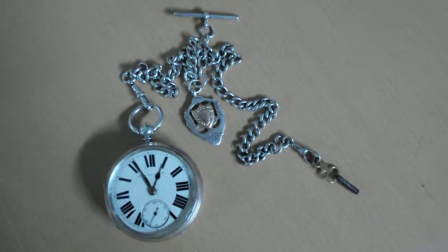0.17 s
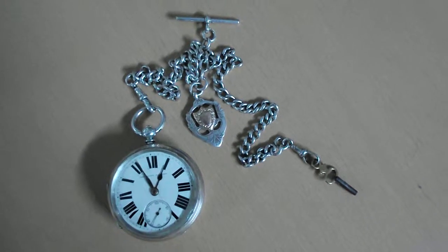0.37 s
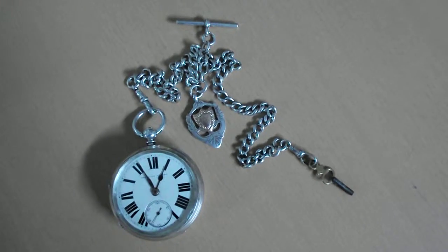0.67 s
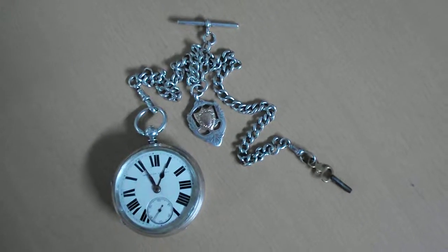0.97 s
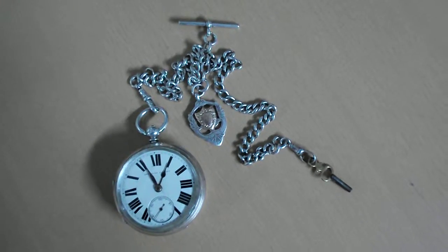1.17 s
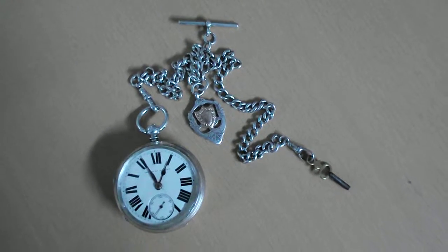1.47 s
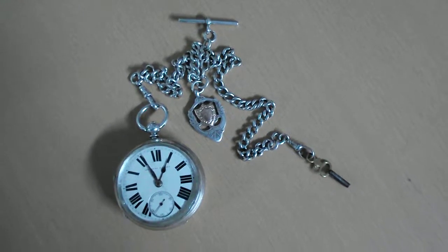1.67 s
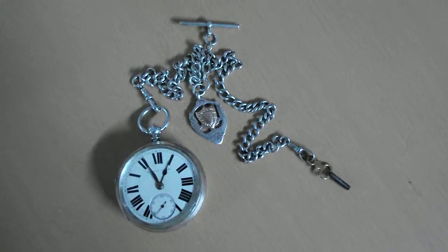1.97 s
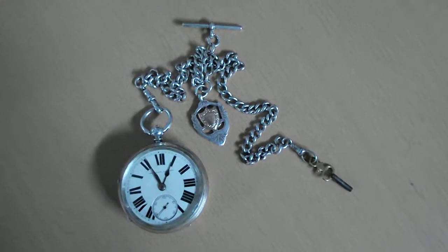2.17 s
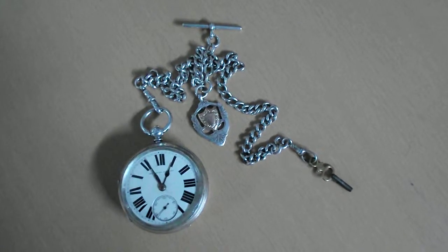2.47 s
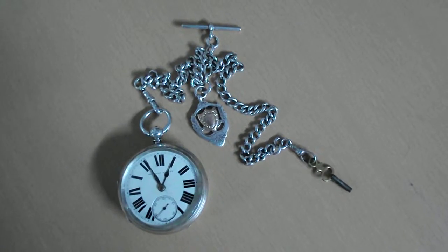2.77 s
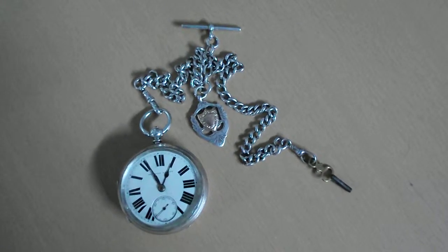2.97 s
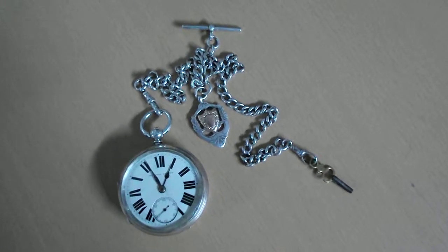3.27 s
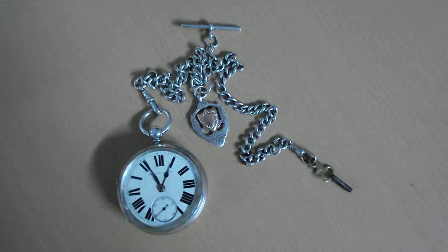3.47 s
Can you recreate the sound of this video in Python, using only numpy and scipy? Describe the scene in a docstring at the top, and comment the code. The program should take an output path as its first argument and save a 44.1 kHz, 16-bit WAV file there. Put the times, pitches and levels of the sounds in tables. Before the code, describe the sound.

Close, dry ticking of a mechanical pocket watch on a table, tick and tock slightly different, from start to end. Behind it are a deep room rumble, microphone hiss, faint rustling and two tiny high whistles.

```python
"""A pocket watch ticks on a table in a quiet room, over a low rumble and a soft hiss that last throughout.
Each beat is a few small blows of the escapement, which excite the decaying modes of the case.
The rumble is noise selected by the room's modes; the microphone hiss and a faint rustle are filtered noise.
A thin electronic whine is a tone multiplied by a square wave; two short whistles are gated, rough tones."""
import sys
import numpy as np
from scipy import signal
from scipy.fft import rfft, irfft
from scipy.io import wavfile
from scipy.ndimage import uniform_filter1d

SR = 44100
rng = np.random.default_rng(int(sys.argv[2]) if len(sys.argv) > 2 else 0)


def volts_from_db(level):
    """Convert decibel levels to linear amplitude ratios."""
    exponent = np.asarray(level, float) / 20
    return 10 ** exponent


def file_out(sig):
    """Save sig as 16-bit WAV at sys.argv[1]."""
    # one column per channel
    cols = np.atleast_2d(sig).T
    # limit, then scale
    lim = np.clip(cols, -1, 1)
    pcm = np.round(lim * 32767).astype(np.int16)
    wavfile.write(sys.argv[1], SR, pcm)


N = 159642  # length [samples]


def level(x, db):
    """Root-mean-square normalisation: scale a signal to an rms level in dB."""
    return x * volts_from_db(db) / np.sqrt(np.mean(x ** 2))


def shaped(gain):
    """Spectral shaping: white noise multiplied by a gain at each frequency."""
    spectrum = rfft(rng.standard_normal(N))
    return irfft(spectrum * gain(np.fft.rfftfreq(N, 1 / SR)), N)


def resonance(f, hz, width_hz):
    """Resonance applied twice: the squared response, at half amplitude across about width_hz."""
    return 1 / (1 + ((f ** 2 - hz ** 2) / (width_hz * f + 1e-9)) ** 2)


def walk(rate):
    """Smoothed random process: rate fresh values per second, averaged twice, spread near 1."""
    hold = int(SR / rate)
    steps = np.repeat(rng.standard_normal(N // hold + 1), hold)
    return 1.08 * uniform_filter1d(uniform_filter1d(steps, hold), hold)[:N]


def curve(rows):
    """Linear interpolation: the columns of a table joined by straight lines in time."""
    rows = np.array(rows)
    return [np.interp(np.arange(N) / SR, rows[:, 0], col) for col in rows.T[1:]]


# room modes driven by distant rumble: (frequency [Hz], width [Hz], gain relative within its range [dB])
ROOM_MODES = [(27, 21.8, -35.5), (40.4, 11.1, -37.5), (62, 15, -47), (101.6, 14, -36), (117.5, 16.4, -40),
              (145.7, 11.2, -44.5), (158.6, 20.3, -42.5), (180, 26, -40), (211.4, 20.6, -46.5),
              (225.1, 20.3, -43), (257.5, 14.4, -47), (269.8, 34, -51.5), (285, 10.6, -48),
              (303.3, 13, -45.5), (407, 20, -60.5), (457, 17, -63), (598, 19.4, -63), (722, 40, -65.5),
              (990, 33, -69)]
# wavering rumble: (time [s], level below 80 Hz [dB], level 80-135 Hz [dB], level 135-270 Hz [dB],
# level above 270 Hz [dB])
RUMBLE_SWELL = [(0, -31, -35, -36, -43.5), (.4, -32, -35, -36.5, -45), (.8, -31.5, -36, -36, -44.5),
                (1.02, -31, -38.5, -38, -45), (1.25, -32, -34, -35, -45), (1.6, -33.5, -36, -38, -47),
                (1.9, -28.5, -38, -38, -45), (2.3, -31.5, -40, -38.5, -43), (2.75, -32.5, -36, -35, -48),
                (3.15, -30.5, -37, -36, -45), (3.35, -29, -38.5, -38, -44.5), (3.62, -31.5, -33, -33, -44)]


def rumble():
    """Modal excitation: each room mode selects its own noise and wavers alone, in ranges of set level."""
    edges_hz, wander_db, wander_rate_hz = (80, 135, 270), 0.8, 4.97
    ranges = np.zeros((len(edges_hz) + 1, N))
    for hz, width_hz, db in ROOM_MODES:
        gain = volts_from_db(db + wander_db * walk(wander_rate_hz))
        mode = shaped(lambda f: resonance(f, hz, width_hz))
        ranges[np.searchsorted(edges_hz, hz)] += gain * mode
    return sum(volts_from_db(db) * level(x, 0) for x, db in zip(ranges, curve(RUMBLE_SWELL)))


# broad floor of room air and microphone: (frequency [Hz], relative spectral level [dB])
HISS_SPECTRUM = [(190, -47), (320, -4.5), (500, -11.5), (990, -15.5), (1400, -18.5), (2500, -20.5),
                 (3600, -22.5), (5500, -25), (8000, -27.5), (11300, -29.5), (16000, -32.5)]


def hiss():
    """Broadband noise: a smooth spectrum, interpolated over log frequency, with a slow level wander."""
    rms_before_wander_db, wander_db, wander_rate_hz = -46, 0.51, 2.74
    hz, db = np.array(HISS_SPECTRUM).T
    wander = volts_from_db(wander_db * walk(wander_rate_hz))
    noise = shaped(lambda f: volts_from_db(np.interp(np.log(f + 1), np.log(hz), db)))
    return wander * level(noise, rms_before_wander_db)


# faint rustle that swells in the hiss: (time [s], rms level before flicker [dB])
RUSTLE_SWELL = [(0, -66), (.3, -60), (.55, -66), (1.0, -66), (1.2, -64), (1.45, -60), (1.7, -66),
                (2.1, -65), (2.38, -66), (2.44, -58), (2.6, -60), (2.75, -63), (3.1, -62), (3.62, -63)]


def rustle():
    """Amplitude-modulated band noise: soft mid-treble noise that swells and quickly flickers."""
    centre_hz, width_hz = 3200, 2300
    flicker_db, flicker_rate_hz = 2.5, 25.04
    envelope = volts_from_db(curve(RUSTLE_SWELL)[0] + flicker_db * walk(flicker_rate_hz))
    return envelope * level(shaped(lambda f: resonance(f, centre_hz, width_hz)), 0)


def whine():
    """Polarity modulation: a lopsided square wave splits a tone into sidebands; a resonance trims the far ones."""
    tone_hz, flip_hz, lopsided, rms_db = 10649.15, 40.335, .115, -60.6
    band_hz, band_width_hz = 10780, 1100
    t = np.arange(N) / SR
    flips = signal.square(2 * np.pi * (flip_hz * t + rng.random())) + lopsided
    spectrum = rfft(flips * np.sin(2 * np.pi * tone_hz * t))
    band = resonance(np.fft.rfftfreq(N, 1 / SR), band_hz, band_width_hz)
    return level(irfft(spectrum * band, N), rms_db)


# short whistles: (start [s], length [s], frequency [Hz], rms level while fully on [dB])
WHISTLES = [(.205, .082, 6515, -59.5), (2.218, .068, 6490, -58.5)]


def whistles():
    """Gated tone with narrowband noise: the noise around each sine makes it slightly rough."""
    rough_width_hz, rough_db, fade_s = 220, -4, .004  # roughness level is relative to the sine
    t, out = np.arange(N) / SR, 0
    for start, length, hz, db in WHISTLES:
        gate = np.clip(np.minimum(t - start, start + length - t) / fade_s, 0, 1)
        rough = level(shaped(lambda f: resonance(f, hz, rough_width_hz)), rough_db)
        sine = np.sqrt(2) * np.sin(2 * np.pi * hz * t)
        out = out + gate * level(sine + rough, db)
    return out


# modes of the case: (frequency [Hz], relative level [dB], t60 [s])
CASE_MODES = [(3625, -9, 0.04), (3674, -8, 0.042), (4320, -10.5, 0.05), (5120, -10.5, 0.038),
              (5460, -7, 0.016), (5760, 1, 0.019), (5920, -4.5, 0.017), (6370, -14, 0.017),
              (6456, -5, 0.022), (6580, -12, .02), (9200, -11.5, 0.011), (10270, -13.5, .015)]
# drop blow of each beat, tick and tock in turn: (time [s], reference level [dB], low modes [dB],
# top modes [dB], rebounds [dB])
BEATS = [(.189, -36.5, -5, -2, 5), (0.4238, -35.5, 3, 1, 0), (0.6545, -32.5, -2, -2, 1),
         (0.889, -32.5, 2.5, -7, -9), (1.1184, -36.5, 0, 1, 3.5), (1.3548, -34.5, -2, -2, 0.5),
         (1.5828, -35.5, -2, 0, 2.5), (1.8202, -33, -2, 0, 0.5), (2.0477, -38.5, 0, 2, 3),
         (2.2852, -33.5, -4, -4, -3), (2.5132, -40.5, 0, 5, 2), (2.7496, -40.5, -1, 1, 4),
         (2.9786, -40, 1.5, 2, 5), (3.2151, -35.5, 1, 1, -3), (3.4436, -37.5, -2.5, -1, 3.5)]
# unlock, impulse, touch, drop, two rebounds: (offset from drop [s], relative level [dB], top modes [dB],
# low modes in a tick [dB], low modes in a tock [dB])
BLOWS = [(-.0435, -19, -2, 1, 1), (-.0222, -22, 11, 0, 0), (-.003, -19, 0, 0, 0), (0, 0, 0, -10, -7),
         (.0022, -7, -2, -2, 4), (.006, -18, -5, 14, 5)]


def watch():
    """Impact excitation: every blow rings the case as a sum of exponentially decaying modes."""
    early_blows_db = -32.5  # reference level of the blows before the drop, alike in every beat
    blow_scatter_db, blow_jitter_s = 1.5, .0003  # for every blow but the drop
    mode_scatter_db, mode_jitter = 1.3, .006  # jitter as a fraction of the mode frequency
    contact_s = 0.00098  # the ring rises linearly over this time
    out, t = np.zeros(N + SR), np.arange(SR // 12) / SR
    modes = np.array(CASE_MODES)
    mode_hz, mode_db, t60 = modes[:, 0], modes[:, 1], modes[:, 2:]
    low = mode_hz < 4800
    top = (mode_hz > 6300) & (mode_hz < 7000)
    decay = np.exp(-np.log(1000) * t / t60)
    contact = np.minimum(t / contact_s, 1)
    chance = rng.standard_normal((len(BEATS), len(BLOWS), 2 + 2 * len(modes)))
    for k, (time, drop_db, low_db, top_db, rebound_db) in enumerate(BEATS):
        for (offset, blow_db, blow_top_db, *blow_low_db), c in zip(BLOWS, chance[k]):
            not_drop = offset != 0
            if offset < 0:
                beat_db = early_blows_db
            else:
                beat_db = drop_db + low * low_db + top * top_db + (offset > 0) * rebound_db
            strength_db = blow_db + not_drop * blow_scatter_db * c[0]
            colour_db = low * blow_low_db[k % 2] + top * blow_top_db  # even beats tick, odd beats tock
            gain = volts_from_db(beat_db + strength_db + mode_db + colour_db + mode_scatter_db * c[2::2])
            hz = mode_hz * (1 + mode_jitter * c[3::2])
            ring = gain @ (np.sin(2 * np.pi * hz[:, None] * t) * decay)
            i = int((time + offset + not_drop * blow_jitter_s * c[1]) * SR)
            out[i:i + len(t)] += ring * contact
    return out[:N]


def scene():
    """Linear superposition: all sources add into one mono channel."""
    return (rumble() + hiss() + rustle() + whine() + whistles() + watch())[None]


def roll_off(x):
    """The treble ends steeply here."""
    return signal.sosfilt(signal.butter(12, 16400, fs=SR, output="sos"), x)


def record(dry):
    """Band limitation: a steep elliptic low-pass filter removes the top above 15740 Hz."""
    low_pass = signal.ellip(12, .1, 60, 15740, fs=SR, output="sos")  # order, ripple [dB], rejection [dB], [Hz]
    mix = signal.sosfilt(low_pass, dry)
    return roll_off(mix)


dry = scene()
out = record(dry)
file_out(out)
```